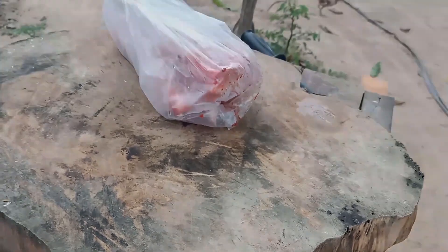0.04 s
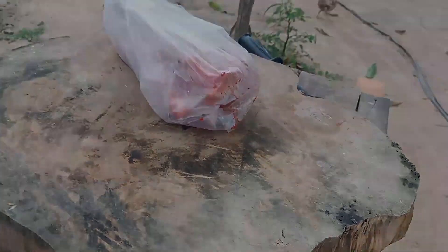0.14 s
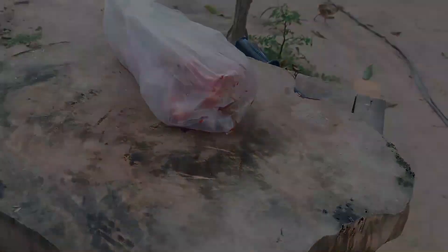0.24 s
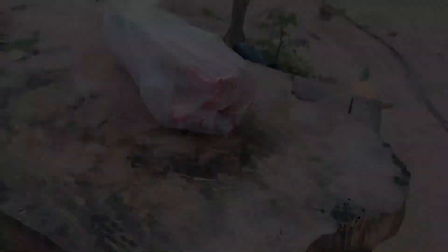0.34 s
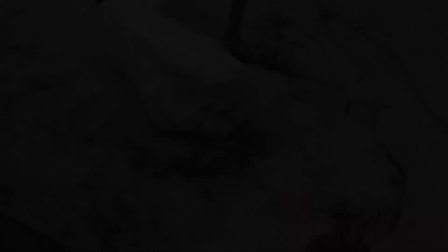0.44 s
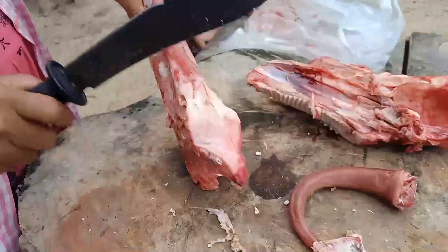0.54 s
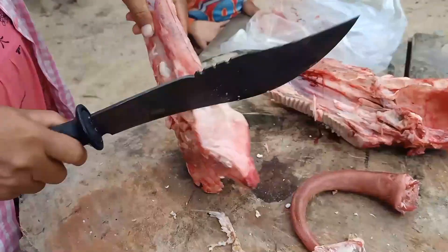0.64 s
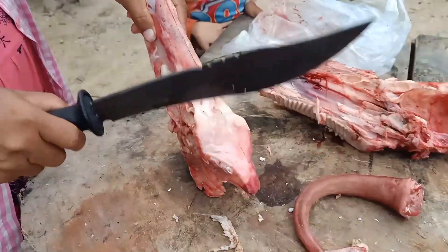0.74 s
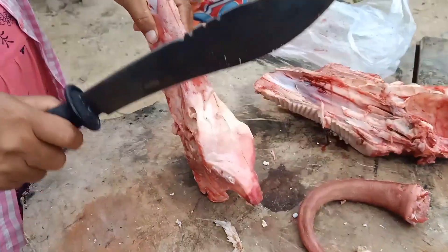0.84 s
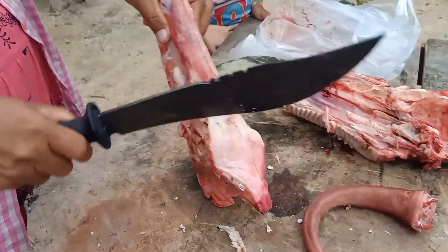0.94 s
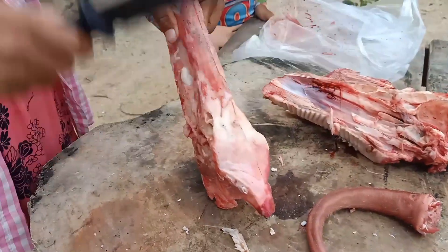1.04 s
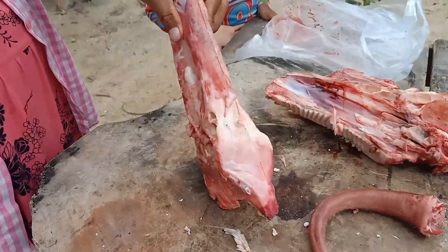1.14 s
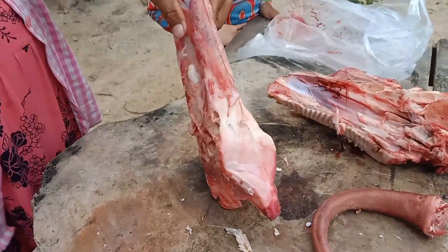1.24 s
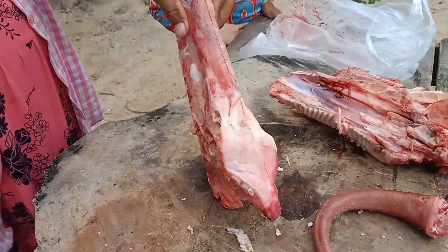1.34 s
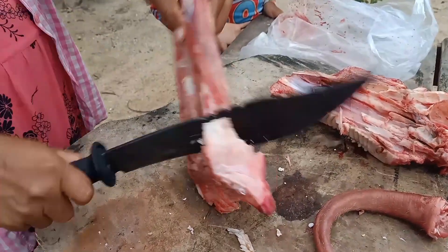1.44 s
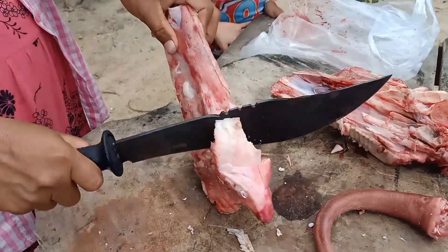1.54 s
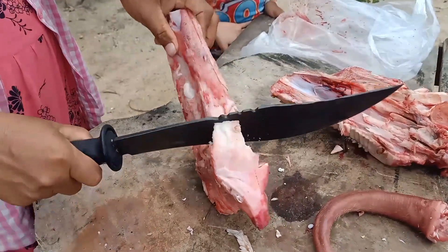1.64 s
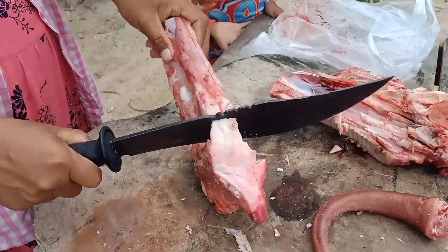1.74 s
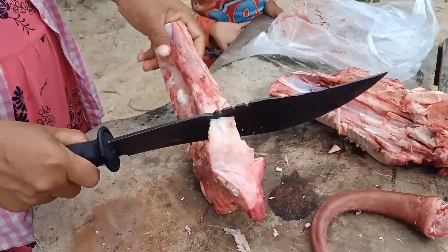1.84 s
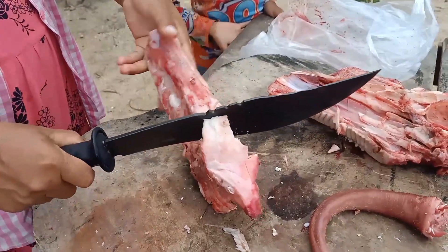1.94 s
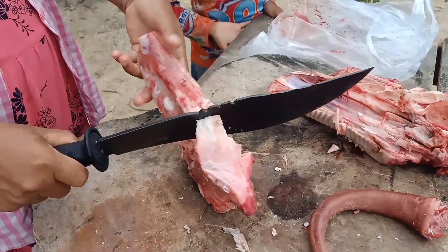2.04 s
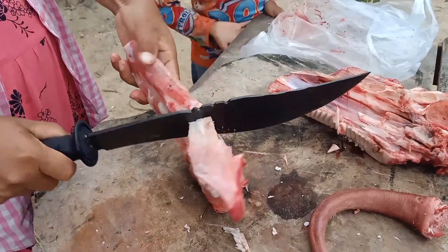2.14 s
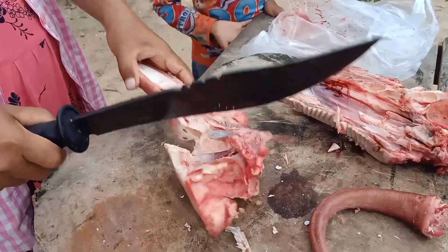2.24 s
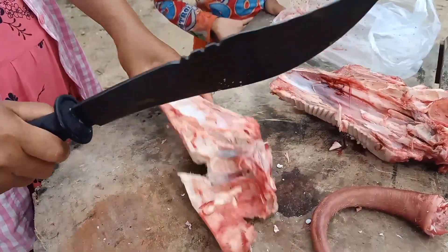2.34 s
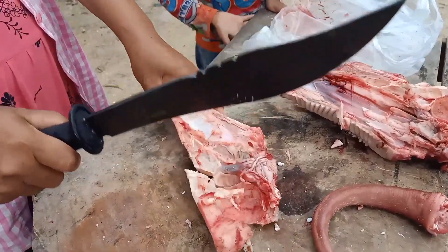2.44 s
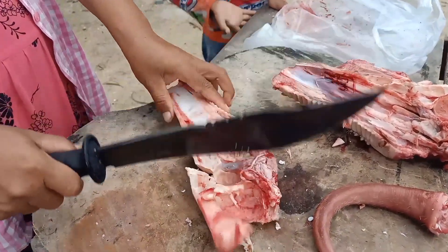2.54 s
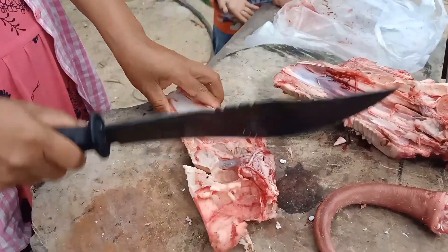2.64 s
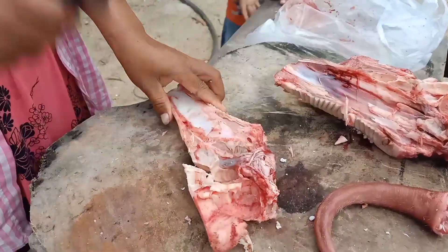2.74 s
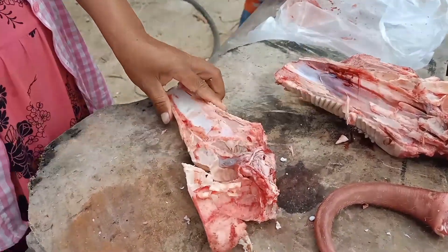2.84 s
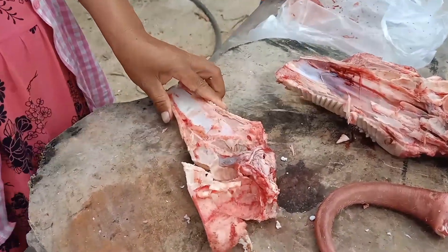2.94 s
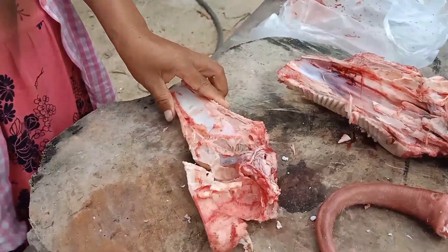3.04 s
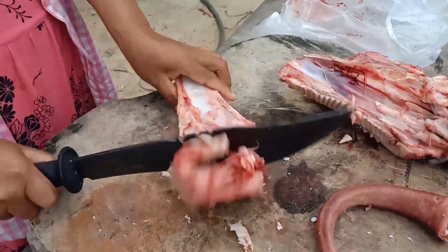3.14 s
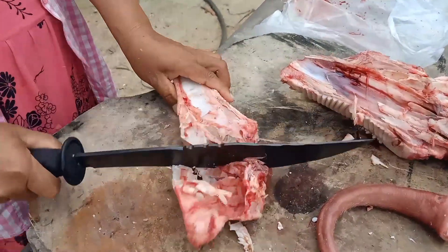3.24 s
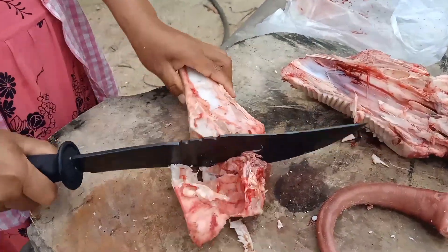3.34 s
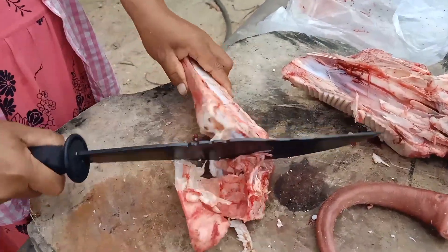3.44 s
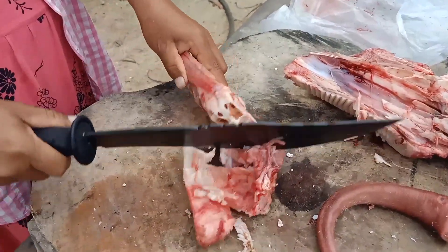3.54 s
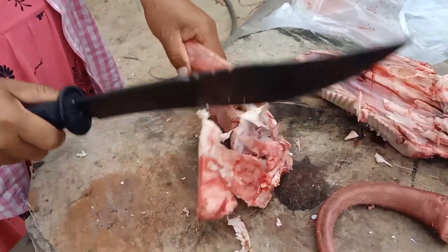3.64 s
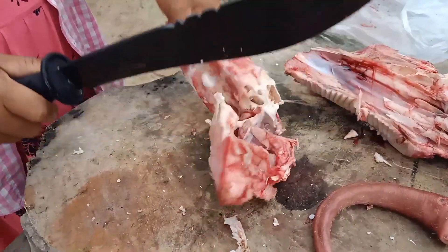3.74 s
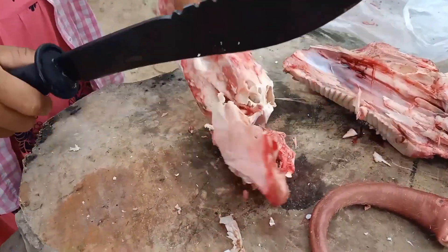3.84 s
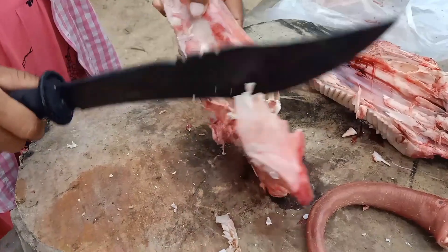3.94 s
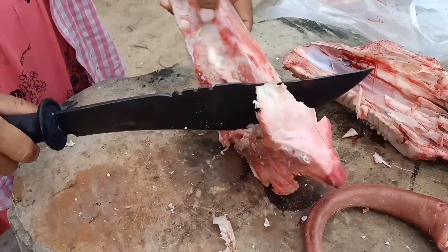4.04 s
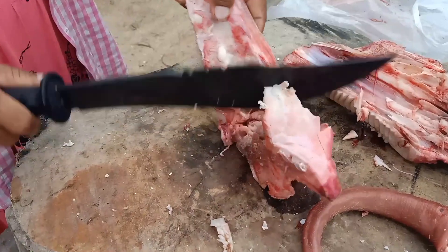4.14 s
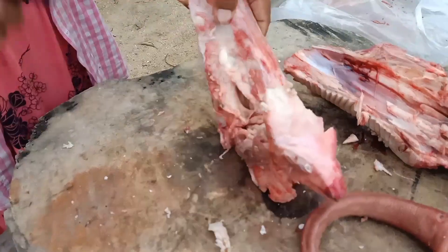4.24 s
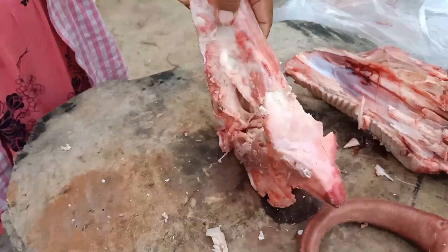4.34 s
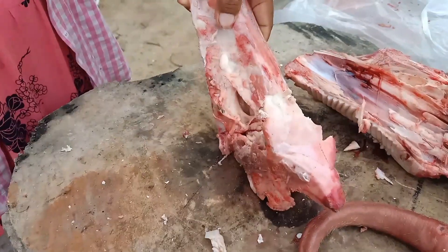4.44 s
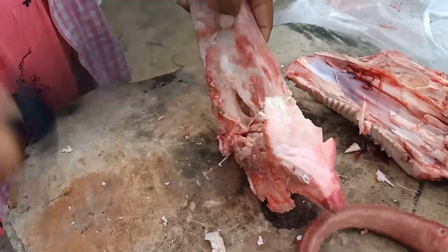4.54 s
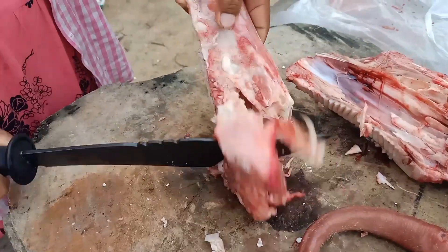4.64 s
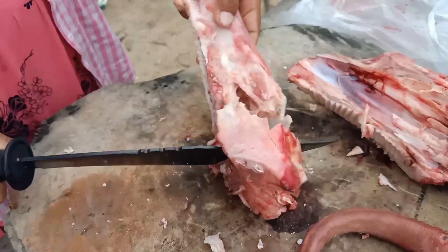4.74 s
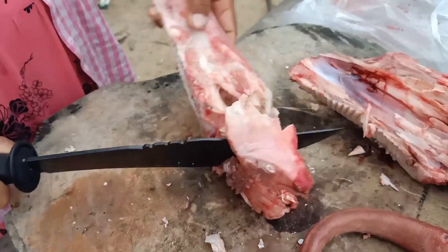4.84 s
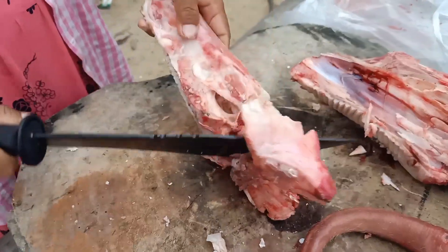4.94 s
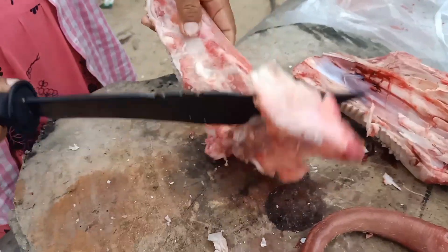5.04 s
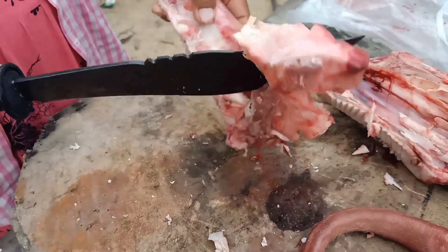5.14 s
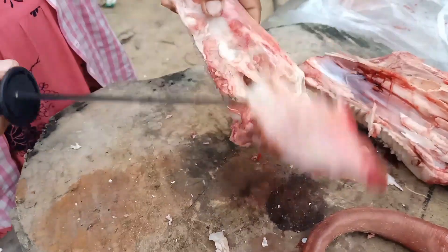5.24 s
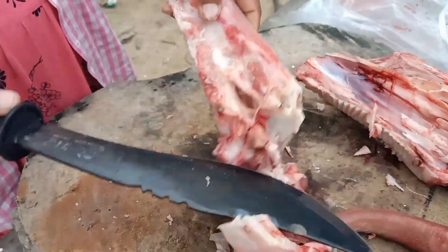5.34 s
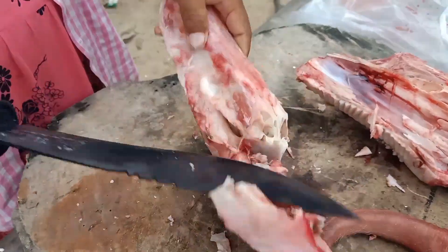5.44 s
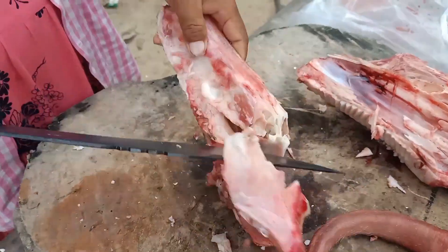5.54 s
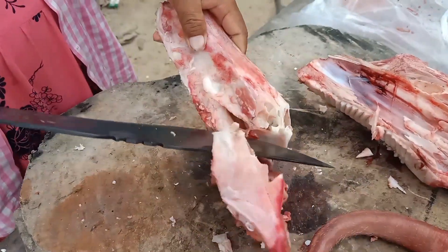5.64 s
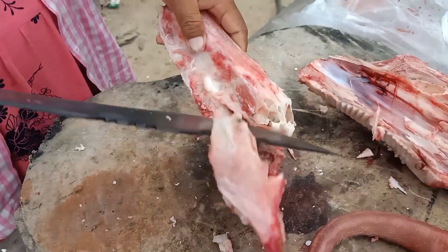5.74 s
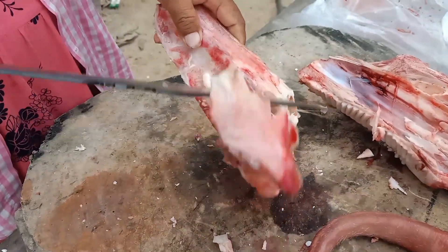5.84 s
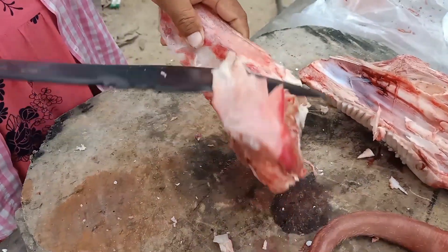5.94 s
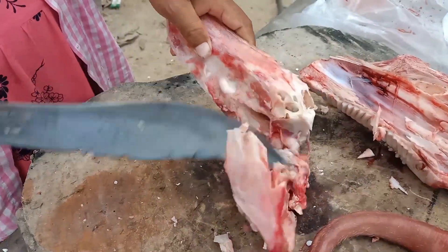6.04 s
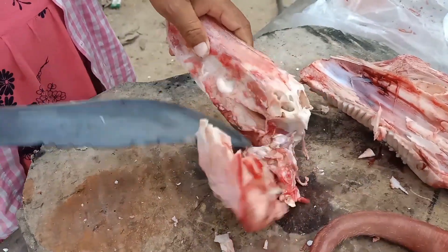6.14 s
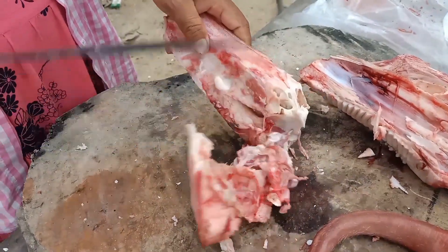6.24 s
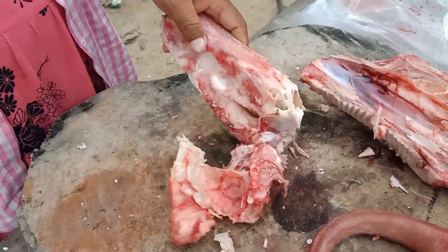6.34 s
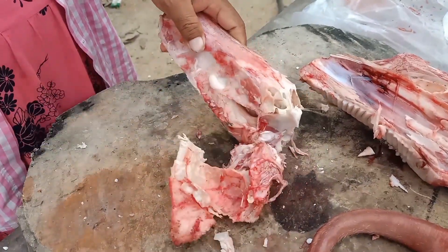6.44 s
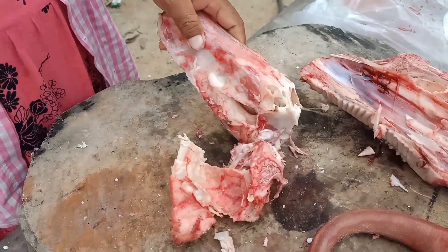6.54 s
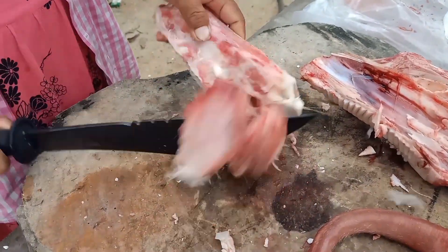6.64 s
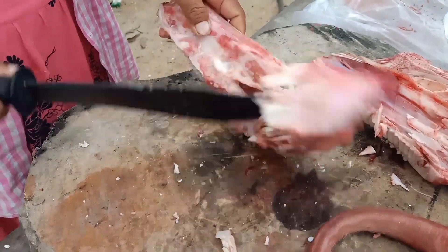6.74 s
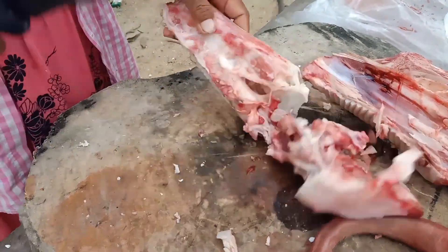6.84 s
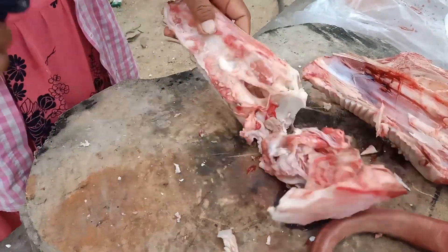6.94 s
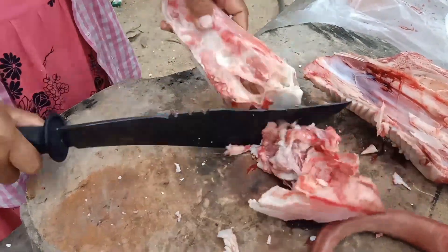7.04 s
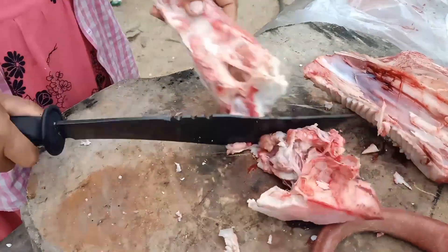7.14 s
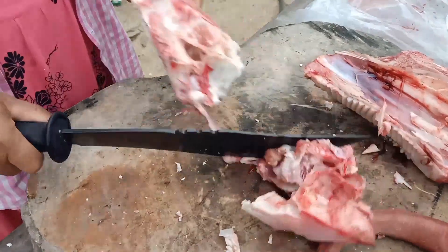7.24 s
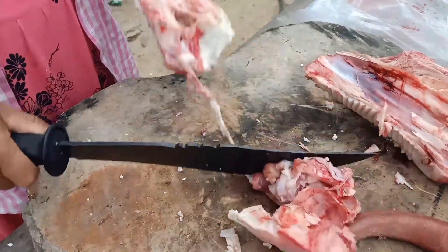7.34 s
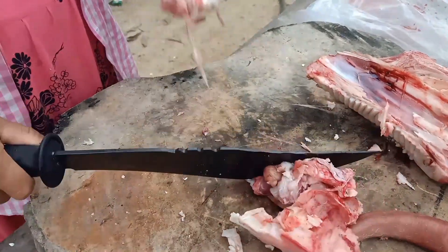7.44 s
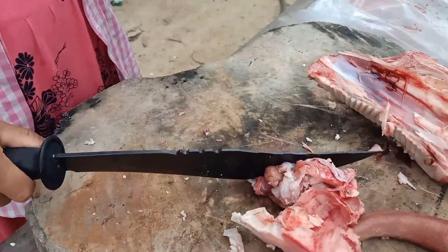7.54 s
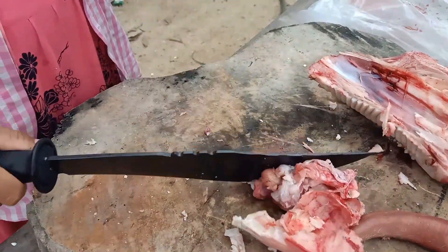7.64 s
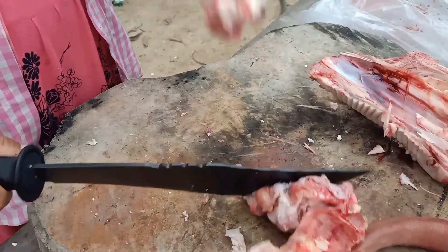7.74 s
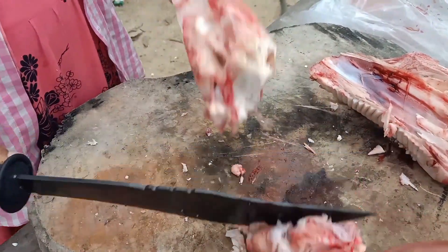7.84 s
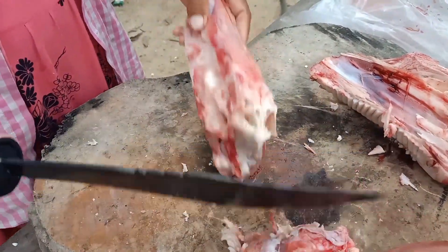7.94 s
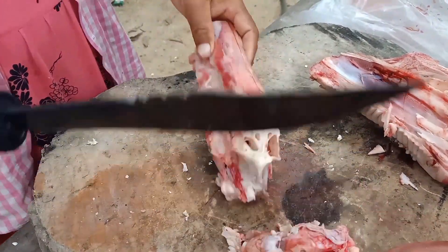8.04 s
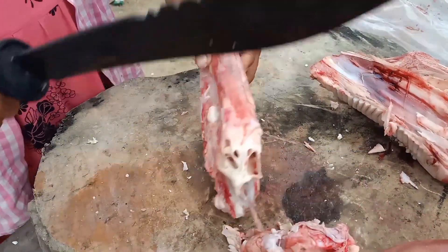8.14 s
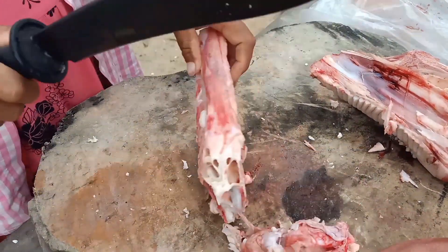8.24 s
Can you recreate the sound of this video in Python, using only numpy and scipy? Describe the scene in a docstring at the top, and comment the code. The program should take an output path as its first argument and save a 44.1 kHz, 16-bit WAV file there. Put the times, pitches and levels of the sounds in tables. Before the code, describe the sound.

For the first half second a wavering low motor hum and yard noise are heard, with a chick's falling peep close on the right and a brief hen cluck, fading to near silence by 0.6. At 0.65 a quieter yard cuts in. Knife blows on bone and a tree stump follow: softer woody ones at 0.75 and 1.0, a very loud splintering crack at 1.55, a lighter one at 2.65, loud again at 3.2, a firm chop at 4.65, a soft knock at 6.15, a hard crunch at 6.75 and a quick double at 7.1. Hollow bone bumps, gritty scrapes and wet settling fill between, with short dull echoes and low ground booms. Chicks peep throughout; a hen croons faintly around 1.2 and 2.6 to 3.2. A distant engine putters, growing slightly after 7, when peeps become clearer and a thin wavering tone appears until 8.3.

```python
"""A village yard, heard by a phone a metre from a tree-stump block. At first a motor hums, a chick peeps close
on the right and a hen clucks; all fades out near 0.6 s, then the yard cuts in and a long knife hacks at a bone.
Each chop is a noise burst of splinters with ringing block, bone and blade; bumps and wet scrapes follow it.
Behind, chicks and hen are gliding whistles, traffic and yard bustle are shaped noise, a far engine is puffs
through a resonant exhaust. A thin far tone wavers near the end."""
import sys
import numpy as np
from scipy import signal
from scipy.fft import rfft, irfft
from scipy.io import wavfile
from scipy.ndimage import uniform_filter1d

SR = 44100
rng = np.random.default_rng(int(sys.argv[2]) if len(sys.argv) > 2 else 0)


def generate_wav(signal):
    """Clip the signal to [-1, 1] and save it as 16-bit WAV at the path in sys.argv[1]."""
    frames = np.transpose(np.atleast_2d(signal))
    scaled = np.clip(frames, -1, 1) * 32767
    pcm = np.round(scaled).astype(np.int16)
    wavfile.write(sys.argv[1], SR, pcm)


N = 365588

# All levels are ahead of the master gain in scene(). Left and right are the two ports of the microphone.
# Knife blows: start_s, level_db of the splinters, then db relative to it: top_db, block_db, bone_db, thump_db,
# ground_db, blade_db, crack_db; splinter length_ms, land_ms (delay of the blow on the block)
CHOPS = [(0.756, -24, -34, 3.5, -22, 0, -25, -46, -9, 3.35, 0.38),
         (1.02, -29.5, -47, 8, 3, 5, -29.5, -19, -0.5, 5.2, 0.58),
         (1.56, -2.5, -18, -18.5, -12, -10.5, -28.5, -20, -7, 7.1, 1.58),
         (2.668, -24.5, -26.5, -13, -18, -16, -35, -42.5, -1, 4.8, 1.1),
         (3.214, -2.5, -15.5, -8, -12.5, -6, -23.5, -38, -8, 7.2, 3.16),
         (4.6641, -11.5, -14, 1.5, -18, -23.5, -22.5, -28, 0, 8, 5.14),
         (6.1567, -30.5, -27, 12, 1.5, 1, -24, -21, -2.5, 2.1, 0.26),
         (6.7427, -4, -13.5, -3, -4, -8.5, -20, -44, -1.5, 9.8, 6.15),
         (7.1242, -17, -35, -12, -6, -29, -47, -45, -15, 15.6, 2.66),
         (7.132, -10.5, -26.5, 7.5, 7.5, -4.5, -27, -36, -9.5, 3.8, 0.41)]
# Ringing modes: pitch_hz, level_db, t60_s; the thump is the stump rocking on the soil
BLOCK = [(515, 0, 0.078), (560, -12, 0.035), (660, -3.5, 0.055), (810.4, -16, 0.066), (865, -18.5, .035),
         (1260, -22.5, 0.032), (395, -28, 0.06)]
BONE = [(753.4, 1.5, 0.026), (1012, -1.5, 0.028), (1280, -9, .015), (352.4, -11, 0.042)]
THUMP = [(158.2, -8, 0.045), (267, 4.5, 0.01)]
BLADE = [(5960, 0, .1), (5500, -8, .03), (4060, -16, .04), (3350, -14, .05)]
# Noise colours: centre_hz, width_hz, level_db; splintering bone, its top treble, and settling meat
SPLINTER = [(1299, 690, 4), (2500, 800, 6), (3900, 1750, -3.5), (5540, 640, 3.5)]
TOP = [(8380, 3400, -17), (10760, 2500, -15), (13410, 1500, -16.5)]
SETTLE = [(161, 28, -1), (388.5, 152, 2.5), (847, 390, -5)]

PORT_PHASE = 0.16  # half the radians by which the left port hears a 500 Hz mode late
THUMP_PHASE = 0.35  # radians added to the port phase
PORT_LAG = 17  # samples by which the yard reaches the left port late
SING_HZ = 5607  # scrapes and rustles above this pitch involve the blade


def amp(db):
    """Decibels to amplitude."""
    return 10 ** (np.asarray(db) / 20)


def unit(x):
    """Scale to an RMS of 1."""
    return x / np.sqrt(np.mean(x ** 2))


def band(x, hz, width):
    """Resonance of gain 1 at its centre."""
    return signal.lfilter(*signal.iirpeak(hz, hz / width, SR), x)


def resonances(x, table):
    """Sum of (centre_hz, width_hz, level_db) resonances, neighbours in opposite sign."""
    return sum((-1) ** k * amp(db) * band(x, hz, width) for k, (hz, width, db) in enumerate(table))


def ring(modes, push_ms, detune, bounces=1, phase=0):
    """Damped modes set off by one smooth push or several quick ones; each port has its own phase; peak 1."""
    t = np.arange(SR // 5) / SR
    ports = np.array([[-1], [1]])
    y = 0
    for (hz, db, t60_s), shift in zip(modes, detune):
        port_phase = (phase + PORT_PHASE * (hz / 500) ** 2) * ports
        y = y - amp(db) * np.sin(2 * np.pi * hz * (1 + shift) * t + port_phase) * 1000. ** (-t / t60_s)
    one_push = np.pad(np.hanning(3 + int(push_ms * SR / 1000)), (0, 30))
    push = np.tile(one_push, bounces)
    y = signal.fftconvolve(y, push[None])[:, :len(t)]
    return y / np.abs(y).max()


def burst(noise, table, ms, fall_ms):
    """Noise that sags for ms, then dies faster, through resonances; peaks near 1."""
    t_ms = np.arange(noise.shape[-1]) * 1000 / SR
    envelope = np.exp(-1.4 * t_ms / ms - np.maximum(t_ms - ms, 0) / fall_ms)
    y = resonances(noise * envelope, table)
    return y / np.sqrt(9 * np.mean(y ** 2) * t_ms[-1] / (ms + 1))


def add(out, s, x, lag=0):
    """Mix x in at s seconds, the left channel lag samples late."""
    for c, row in enumerate(np.broadcast_to(x, (2, x.shape[-1]))):
        i = int(s * SR + (lag if c == 0 else 0))
        out[c, i:i + len(row)] += row[:N - i]


def walk(rate):
    """Random levels held 1 / rate s and smoothed twice; spread near 1."""
    k = int(SR / rate)
    steps = np.repeat(rng.standard_normal(N // k + 1), k)
    return 1.3 * uniform_filter1d(uniform_filter1d(steps, k), k)[:N]


def calls(tables, lags, overtones_db, rough, flutter_hz, edge_s):
    """Gliding tones with overtones from (time_s, pitch_hz, level_db) tables; rough flutters level and pitch."""
    out = np.zeros((2, N))
    flutter = walk(flutter_hz)
    overtones_db = np.broadcast_to(overtones_db, (len(tables), np.shape(overtones_db)[-1]))
    for table, lag, overtones in zip(tables, lags, overtones_db):
        s, hz, db = np.transpose(table)
        t = np.arange(s[0], min(s[-1], (N - 2) / SR), 1 / SR)
        wobble = flutter[int(s[0] * SR):][:len(t)]
        glide = uniform_filter1d(np.interp(t, s, hz), size=500, mode="nearest")  # every turn is rounded
        phase = 2 * np.pi * np.cumsum(glide * (1 + 0.037 * rough * wobble)) / SR
        edge = np.clip(np.minimum(t - s[0], s[-1] - t) / edge_s, 0, 1)
        tone = sum(amp(o) * np.sin((k + 1) * phase) for k, o in enumerate(overtones))
        level = np.sqrt(2) * amp(np.interp(t, s, db) + 2.9 * rough * wobble)
        add(out, s[0], level * edge * tone, lag)
    return out


def chops():
    """Bone splinters for some ms while the edge bites; block, bone and blade ring on."""
    top_share = 0.35  # the top treble lasts this share of the splintering
    crack_ms = 0.6
    crumble_db, crumble_ms = -25, 26  # bits of bone crunch on after the cut
    body_low_hz = 330  # the ring of block and bone is thinned below this
    out = np.zeros((2, N))
    for s, db, top_db, block_db, bone_db, thump_db, _, blade_db, crack_db, ms, land_ms in CHOPS:
        noise, detune = rng.standard_normal((3, 2048)), rng.standard_normal((4, 8))
        # splinters fly from many points, so each port hears its own mix
        grit = (noise[0] + 1.4 * noise[1:]) * amp(4 * rng.standard_normal(64).repeat(32))
        splinters = burst(grit, SPLINTER, ms, 2.8)
        splinters = splinters + amp(top_db) * burst(grit, TOP, top_share * ms, 1.6)
        add(out, s, amp(db) * splinters)
        crumble = burst(grit[::-1], SETTLE[1:] + SPLINTER[:2], crumble_ms, 7.4)
        add(out, s, amp(db + crumble_db) * crumble)
        add(out, s, amp(db + crack_db) * burst(noise[1:], SPLINTER, crack_ms, 0.27))
        add(out, s, amp(db + blade_db) * ring(BLADE, 0.05, 0.00089 * detune[0]))
        body = amp(block_db) * ring(BLOCK, 0.25, 0.005 * detune[1])
        body = body + amp(bone_db) * ring(BONE, 0.4, 0.04 * detune[2])
        body = signal.lfilter(*signal.butter(2, body_low_hz, "high", fs=SR), body)
        thump = amp(thump_db) * ring(THUMP, 0.95, 0.11 * detune[3], phase=THUMP_PHASE)
        add(out, s + land_ms / 1000, amp(db) * (body + thump))
    return out


def knocks():
    """Soft bumps: the bone chatters down and gives a short hollow ring with some block."""
    # Bone on block, before fixed trims: start_s, level_db; relative to it: block_db, click_db
    bumps = [(0.843, -28, -9, -36), (0.933, -34, -6, -15), (1.066, -29.5, -2, -29), (1.227, -39.5, -6, -5),
             (1.292, -41, -5, -6.5), (1.61, -32, 3, -23), (1.654, -45, 6, -18), (1.69, -26, -7, -18.5),
             (1.853, -22, -8, -41), (1.963, -36, -5, -12), (2.076, -28, -6, -24.5),
             (2.141, -41.5, 2.5, -19), (2.201, -41, 2.5, -20.5), (2.474, -46.5, 13.5, -3),
             (3.259, -26, 11, -17), (3.31, -22.5, -2.5, -16), (3.398, -40.5, -1.5, 0.5),
             (3.445, -23, -8.5, -30), (3.621, -45, -0.5, -18.5), (3.738, -43, 0, -19.5),
             (4.107, -42.5, 1, -6), (4.121, -40, 2, -6), (4.134, -38.5, -4, -9), (4.766, -20, -11, -23),
             (4.807, -32.5, -5, -37), (4.844, -34.5, -5, -16), (4.935, -29, -7, -14.5),
             (5.056, -43, -2.5, -15), (5.082, -35.5, -10, -21), (5.128, -43, -13.5, 1),
             (5.452, -44, 13.5, 10), (5.7, -38.5, -19, 0.5), (6.394, -44, -24.5, -0.5),
             (6.477, -33, 7, -17), (6.88, -16.5, -24, -23), (6.935, -32.5, 16, 4), (7.031, -25, -15, -20),
             (7.106, -36.5, -16.5, -25), (7.359, -23, -4, -20.5), (7.475, -39, -11, -15),
             (7.605, -33, 0, -20.5)]
    settle_db, settle_s = -15.5, 0.009  # meat settles, under the bump's level and this much later
    out = np.zeros((2, N))
    for s, db, block_db, click_db in bumps:
        noise, detune = rng.standard_normal((2, 1024)), rng.standard_normal((3, 8))
        bone = ring(BONE, 0.55, 0.02 * detune[0], bounces=3)
        bone += 0.5 * ring(BONE, 0.26, 0.013 * detune[2])
        bone += 0.14 * ring(THUMP, 0.58, 0.074 * detune[2], phase=THUMP_PHASE)
        block = amp(block_db - 12.5) * ring(BLOCK, 1.26, 0.0038 * detune[1])
        add(out, s, amp(db) * (0.38 * bone + block))
        click = burst(band(noise, 1800, 2500), SPLINTER[:2], 0.79, 2.5)
        add(out, s, amp(db + click_db) * click)
        meat = burst(noise[0] + 0.51 * noise[::-1], SETTLE, 5, 2.4)
        add(out, s + settle_s, amp(db + settle_db) * meat)
    return out


def ticks():
    """Short gritty scrapes of blade on bone or wet meat letting go; the highest set the blade singing."""
    # Scrapes: start_s, level_db, centre_hz, top_db relative to the level, length_ms
    scrapes = [(1.267, -49, 5300, -45.5, 3.6), (1.893, -52, 2280, -32.5, 2.1), (2.466, -52, 1800, -40, 2.5),
               (2.475, -52, 5500, -35.5, 2.1), (2.49, -44, 1400, -40, 4.9), (2.501, -48.5, 3850, -32, 2.8),
               (3.117, -49, 5450, -37.5, 2.6), (3.319, -41.5, 3250, -40, 2.9),
               (3.553, -53.5, 5480, -34.5, 4), (3.7472, -58.5, 5930, -30.5, 1.9),
               (4.1112, -49.5, 3420, -22, 9.3), (4.135, -50.5, 4600, -37.5, 6.4),
               (4.7897, -49.5, 5050, -25, 2.5), (4.846, -43.5, 1930, -41, 8.3),
               (5.0858, -37, 1430, -41, 7.1), (5.4448, -34, 2500, -35, 5.4), (5.47, -37.5, 4300, -44, 7.3),
               (5.701, -43.5, 2800, -35.5, 2.5), (6.097, -41, 2360, -38, 5.7),
               (6.1308, -41.5, 1620, -33.5, 8.7), (6.1814, -53, 2980, -29, 2.6),
               (6.2265, -47.5, 4820, -36.5, 2.9), (6.2783, -32, 2100, -35.5, 4.7),
               (6.8528, -29.5, 2420, -35.5, 3.1), (6.8753, -31, 2770, -41, 2.7),
               (6.899, -38, 5070, -30, 5.1), (6.958, -41.5, 1510, -28, 2.5), (6.969, -50.5, 4340, 0, 4.1),
               (7.022, -37.5, 2500, -61.5, 1.4), (7.082, -48.5, 2390, -41, 2.9),
               (7.393, -44, 5620, -23.5, 3.7)]
    sing_db, faint_db = 6, -27  # the blade's ring relative to a high scrape, and to any other
    out = np.zeros((2, N))
    for s, db, hz, top_db, ms in scrapes:
        noise = rng.standard_normal((3, 1024))
        grit = (noise[0] + 0.9 * noise[1:]) * amp(4 * rng.standard_normal(32).repeat(32))
        colour = [(hz, 1200, 0)] + [(f, w, d - 14) for f, w, d in SPLINTER]
        scrape = burst(band(grit, hz, 2000), colour, ms, 0.42)
        scrape = scrape + amp(top_db) * burst(grit, TOP, ms, 0.91)
        add(out, s, amp(db) * scrape)
        blade_db = sing_db if hz > SING_HZ else faint_db
        add(out, s, amp(db + blade_db) * ring(BLADE, 0.05, np.zeros(4)))
    return out


def thuds():
    """Each chop booms in the ground, a low rising tone lingers after hard ones; the ports hear it out of step."""
    # Soil under the stump: pitch_hz, level_db, t60_s
    soil = [(52, -5.5, 0.06), (87, 0, 0.055)]
    # Low tone, perhaps the blade flexing in the cut: after_chop_s, pitch_hz, level_db
    quiver = [(.03, 66.02, -62), (.35, 76.15, -64), (.75, 86, -71.5)]
    ground_phase = 0.7  # radians added to the port phase
    quiver_from_db = -14  # only harder chops leave the tone
    out = np.zeros((2, N))
    for s, db, *_, ground_db, _, _, _, land_ms in CHOPS:
        boom = ring(soil, 1.8, 0.11 * rng.standard_normal(2), phase=ground_phase)
        add(out, s + land_ms / 1000, amp(db + ground_db) * boom)
    hard = [row[0] for row in CHOPS if row[1] > quiver_from_db]
    tones = [[(s + late, hz, db) for late, hz, db in quiver] for s in hard]
    return out + calls(tones, [40] * len(hard), [0, -4], 0.9, 20, 0.03)


def scratches():
    """Short patches of gritty rustle, of meat on wood or feet in litter; narrow ones are the blade rattling on bone."""
    # Rustles: start_s, length_s, level_db, centre_hz
    rustles = [(1.22, 0.12, -60.5, 2000), (2.12, 0.068, -70, 2780), (2.294, 0.11, -63, 2270),
               (2.962, .09, -65.5, 2900), (3.088, 0.044, -56.5, 2580), (3.578, 0.079, -67, 2800),
               (3.778, 0.15, -58, 2570), (4.104, .04, -55, 910), (4.845, 0.021, -51, 1600),
               (5.433, 0.067, -52, 2600), (5.784, 0.053, -59, 3100), (7.532, 0.051, -56.5, 2600),
               (7.294, 0.13, -61, 5800), (5.588, .045, -64, 2900), (1.948, 0.12, -70.5, 2400),
               (3.331, .09, -67, 1050), (6.892, 0.081, -59.5, 1500), (6.9, .04, -56, 4500)]
    out = np.zeros((2, N))
    for s, length, db, hz in rustles:
        noise = rng.standard_normal((3, 8192))
        grain = np.minimum(rng.exponential(size=128), 3).repeat(64)
        width_hz = 150 if hz > SING_HZ else 1200
        grit = (noise[0] + noise[1:]) * amp(3 * grain)
        grit = band(band(grit, hz, width_hz), hz, 2 * width_hz)
        n = int(length * SR)
        add(out, s, amp(db) * unit(grit)[:, :n] * np.hanning(n) ** 0.5, PORT_LAG)
    return out


def near_chick():
    """Two falling whistles of one chick close on the right."""
    # One table a peep: time_s, pitch_hz, level_db (before the balance below)
    falls = [
        [(0.088, 4120, -62), (.122, 3780, -50), (0.134, 3320, -37), (0.166, 3084, -37), (0.186, 2500, -50)],
        [(0.45, 4300, -76), (.502, 3760, -60.5), (0.513, 3260, -47.5), (.545, 3150, -49.5), (0.562, 2600, -54)],
    ]
    left_right_db = [[-6], [3]]
    return calls(falls, [-11] * 2, [0, -45], 0.028, 80, 0.01) * amp(left_right_db)


def peeps(rows):
    """Pitch and level of each peep: it swells on a slightly arched note, then drops."""
    # How well each pitch comes through: pitch_hz, gain_db
    carry = [(1700, 4), (2600, 6), (3100, -1.5), (3600, -4.5), (4100, 3.5), (4550, 1.5), (5200, 1.5)]
    held_s = 0.02  # a shorter peep is a falling cheep without the arch
    rise, sag = 0.045, 0.03  # shares of the pitch by which a held note starts and ends flat
    arch = 0.3  # share of the hold spent rising
    bend = 2.8  # over 1 the drop after a held note starts gently and steepens
    swell_db = 5.5  # gain over the hold
    s, hold, drop, hz, end_hz, db = np.transpose(rows)
    hold = np.maximum(hold, 0)
    held = hold > held_s
    knee_hz = hz * (1 - sag * held)
    part = np.linspace(0, 1, num=8)[:, None]
    times = np.vstack([s, s + hold * arch, s + hold + part * drop])
    fall_hz = knee_hz + part ** np.where(held, bend, 1) * (end_hz - knee_hz)
    pitch = np.vstack([hz * (1 - rise * held), hz, fall_hz])
    level = np.vstack([db - swell_db, db - swell_db / 2, db + 0 * part])
    level = level + np.interp(pitch, *np.transpose(carry))
    return np.transpose([times, pitch, level], (2, 1, 0))


def brood():
    """Chicks about the yard whistle notes that drop at the end."""
    # Peeps: start_s, hold_s, drop_s, note_hz, end_hz, level_db (before the gain by pitch)
    notes = [(0.646, 0.0027, 0.014, 4010, 3080, -60.5), (0.788, 0.05, 0.037, 4070, 2700, -63.5),
             (0.955, 0.01, .066, 4420, 3400, -68), (1.1, 0.16, 0.022, 4880, 4600, -70.5),
             (1.16, 0.1, 0.033, 4060, 2750, -55.5), (1.29, 0.0011, 0.047, 4090, 2265, -59),
             (1.315, 0.011, 0.033, 3800, 2680, -66), (1.366, 0.0056, 0.039, 3210, 2590, -67.5),
             (1.51, 0, 0.028, 4350, 3900, -73.5), (1.79, 0, 0.025, 4230, 3240, -65),
             (1.906, 0.0097, 0.054, 3510, 1987, -69.5), (1.93, 0, 0.034, 4150, 3260, -68.5),
             (1.99, 0.095, 0.013, 4090, 3510, -63.5), (2.11, 0.034, 0.12, 4760, 2604, -69.5),
             (2.278, 0.00075, 0.032, 3950, 3430, -65), (2.244, 0.057, 0.012, 4045, 3870, -66.5),
             (2.297, 0.025, 0.011, 3180, 2800, -65.5), (2.34, 0.055, 0.085, 4880, 2620, -67.5),
             (2.63, 0.02, 0.032, 2045, 1914, -73), (2.68, 0.0061, 0.022, 3470, 2500, -64.5),
             (2.681, 0.1, 0.029, 3950, 2760, -54.5), (2.842, 0.0093, 0.018, 3010, 2430, -60.5),
             (2.965, 0, 0.034, 3570, 2500, -66.5), (3.02, 0.0019, 0.022, 3010, 2510, -63),
             (3.036, 0, 0.053, 3950, 3480, -63.5), (3.105, 0.058, 0.032, 4080, 3600, -57.5),
             (3.41, 0.041, 0.06, 4140, 2700, -67.5), (3.45, 0.0014, 0.035, 3840, 2710, -69),
             (3.59, 0, 0.029, 3360, 2420, -72), (3.564, 0.0029, 0.039, 4150, 3410, -69),
             (3.645, 0, 0.019, 3420, 2500, -69.5), (3.686, 0, 0.014, 4220, 3480, -69.5),
             (3.705, 0.037, 0.056, 4210, 2750, -66), (3.832, 0.027, 0.13, 4020, 1860, -67.5),
             (3.878, 0.029, .027, 3840, 2570, -68), (4.016, 0.046, 0.032, 4180, 3820, -63.5),
             (4.055, 0.0023, .022, 4050, 2400, -64.5), (4.072, 0, 0.023, 3480, 2050, -66.5),
             (4.147, 0.063, 0.018, 4950, 4600, -69.5), (4.22, 0, 0.068, 3900, 2976, -71),
             (4.374, 0.064, 0.041, 4280, 2500, -63.5), (4.47, 0.016, 0.019, 3300, 2427, -61),
             (4.53, 0.025, 0.045, 3800, 2210, -65.5), (4.575, 0.1, .011, 5180, 5170, -66),
             (4.59, 0.032, 0.0089, 4730, 4580, -66), (4.716, 0.0031, 0.02, 3220, 2710, -62),
             (4.79, .03, 0.094, 4030, 3860, -78), (5.13, 0.0055, 0.05, 4900, 4200, -67.5),
             (5.23, 0.08, .03, 4680, 4500, -76.5), (5.1, 0.088, .035, 4140, 4030, -67.5),
             (5.192, 0.014, 0.023, 3390, 2440, -66.5), (5.243, 0, 0.023, 3790, 2620, -67),
             (5.318, 0.0028, .035, 4080, 2730, -68), (5.37, 0.076, .015, 4940, 4530, -63.5),
             (5.47, 0.041, 0.028, 4200, 3900, -65.5), (5.554, 0.005, 0.012, 3220, 2360, -58),
             (5.66, 0.08, 0.042, 4530, 4100, -69.5), (5.77, 0.0016, 0.023, 3170, 2240, -63),
             (5.896, 0, 0.051, 2940, 1720, -66.5), (5.955, 0.03, 0.019, 4040, 3900, -69.5),
             (6.016, 0, 0.018, 3210, 2450, -63), (6.02, 0.021, .1, 5080, 4290, -65),
             (6.33, .1, 0.044, 4650, 4190, -64.5), (6.34, 0.0046, 0.024, 3400, 2340, -59.5),
             (6.446, 0.0063, 0.015, 3070, 2340, -59), (6.49, 0.0088, .02, 3100, 2605, -64.5),
             (6.546, 0.0026, 0.019, 3180, 1996, -55.5), (6.675, 0.0036, 0.02, 3200, 2280, -63),
             (6.576, 0.08, 0.049, 4240, 2210, -63.5), (6.62, 0.12, .02, 4930, 4800, -66.5),
             (6.94, 0.04, 0.049, 4250, 3200, -67), (7.308, 0.057, 0.051, 4260, 2500, -58),
             (7.385, 0.015, .022, 2776, 1910, -63.5), (7.3, 0.14, 0.1, 4570, 2540, -57),
             (7.33, .13, 0.02, 4730, 4450, -65), (7.596, 0.06, 0.1, 4900, 2470, -61.5),
             (7.67, 0.029, .035, 3900, 2650, -69), (7.722, 0.075, 0.068, 4080, 2610, -57.5),
             (7.87, 0.031, .04, 4530, 4080, -64), (7.97, 0, .05, 3210, 2850, -75),
             (8.03, .165, 0.059, 4570, 2480, -56), (8.09, 0.048, 0.0076, 4780, 4680, -68),
             (8.17, 0, 0.034, 3220, 1980, -75.5), (8.23, 0.07, .01, 3994, 3980, -62),
             (8.255, 0, 0.015, 3210, 2500, -51)]
    return calls(peeps(notes), [15] * len(notes), [0, -36], 0.16, 60, 0.0056)


def croons():
    """The hen's pitch bends early, then levels off, while the throbbing voice swells."""
    # Croons and clucks: start_s, length_s, first_hz, last_hz, last level_db (before the throb), overtones_db
    voice = [(0.126, 0.031, 1065, 1004, -56, -11), (0.162, 0.044, 580, 570, -61, -19),
             (1.165, 0.38, 541.4, 733, -61, -8), (2.579, 0.2, 277, 312.3, -64.5, -10),
             (2.87, .11, 269, 255, -67.5, -13.5), (2.877, 0.063, 628, 625, -70, -2.5),
             (2.981, 0.21, 488, 604, -67, -6), (3.818, 0.0696, 835, 644, -72, -6),
             (6.54, 0.11, 891, 823, -68.5, -16.5), (6.644, 0.046, 748, 737, -76.5, 11.5)]
    bend, swell_db_per_s = 0.8, 19.5  # a bend under 1 moves the pitch most at the start
    s, length, first_hz, last_hz, db, over_db = np.transpose(voice)
    part = np.linspace(0, 1, num=9)[:, None]
    pitch = first_hz + (last_hz - first_hz) * part ** bend
    level = db - swell_db_per_s * length * (1 - part)
    tables = np.transpose([s + part * length, pitch, level], (2, 1, 0))
    overtones = np.transpose([0 * db, over_db, 1.5 * over_db - 3])
    hen = calls(tables, [8] * len(voice), overtones, 0.6, 80, 0.015)
    throb_hz = 30 + 4 * walk(12)
    return hen * (1 + 0.7 * np.sin(2 * np.pi * np.cumsum(throb_hz) / SR))


def far_chicks(db, count):
    """The rest of the brood peeps at random times, mostly short falling cheeps."""
    s, note, hold, drop, loud = rng.random((count, 5)).T
    hz = 2900 + 1700 * note
    hold_s = 0.0027 + 0.048 * hold ** 4
    drop_s = 0.01 + 0.025 * drop
    rows = np.transpose([s * 8.2, hold_s, drop_s, hz, hz * 0.72, db + 9 * loud])
    return calls(peeps(rows), [PORT_LAG] * count, [0], 0.3, 60, 0.012)


def echoes(x):
    """Huts and trees return a short, dull, unrelated wash to each port."""
    t60_s, level_db = 0.26, -23
    delay_s, low_hz = 0.0009, 744  # nearest wall; below this pitch little returns
    wall_s, wall_spread_s, wall_db = 0.04, 0.012, 4  # one wall answers louder
    patchy_db = 4  # the wash comes in lumps
    t = np.arange(int(0.5 * SR)) / SR
    tail = rng.standard_normal((2, len(t))) * 1000. ** (-t / t60_s) * np.clip((t - delay_s) / 0.0094, 0, 1)
    lumps = uniform_filter1d(rng.standard_normal(len(t) // 150).repeat(150), size=60)
    tail *= amp(patchy_db * lumps + wall_db * np.exp(-((t - wall_s) / wall_spread_s) ** 2))
    tail = signal.lfilter([1], [1, -0.1], tail)
    tail = signal.lfilter(*signal.butter(2, low_hz, "high", fs=SR), tail)
    tail = tail / np.sqrt(np.sum(tail ** 2) / 2)
    return amp(level_db) * signal.fftconvolve(x, tail, axes=1)[:, :N]


def hum():
    """A motor hums at first: a wavering low tone with four overtones."""
    # Motor: time_s, pitch_hz, level_db
    motor = [(0, 118.1, -56), (.3, 116.1, -64), (.58, 116.8, -74)]
    return calls([motor], [0], [-1.5, -3.0, -12.0, -23, -20.5], 0.35, 22.5, 0.0047)


def whine():
    """A thin far tone that wavers."""
    # Tone: time_s, pitch_hz, level_db
    thin_tone = [(7.35, 870, -78), (7.5, 870, -68), (8.25, 860, -69)]
    return calls([thin_tone], [PORT_LAG], [0], 0.32, 30, 0.019)


def engine():
    """A slow engine idles far off: one puff a firing, each a little different, rings the exhaust."""
    # Idle: time_s, firing_hz, level_db
    idle = [(.6, 28.27, -73), (.64, 28.28, -71.5), (2.799, 28.27, -72), (4.001, 28.63, -66),
            (4.6, 28.96, -68), (6.0, 28.79, -67.5), (7.4, 28.45, -60), (8.29, 27.7, -61)]
    # Exhaust resonances, passed twice: centre_hz, width_hz, level_db
    exhaust = [(79.44, 42, 1), (160, 120, 1.5), (300, 110, 1), (418, 68, -5.5)]
    s, hz, db = np.transpose(idle)
    t = np.arange(N) / SR
    firings = np.cumsum(np.interp(t, s, hz) * (1 + 0.002 * walk(15))) / SR
    size = amp(1.5 * rng.standard_normal(400))[firings.astype(int)]
    puffs = np.diff(firings // 1, prepend=0) * size
    return unit(resonances(resonances(puffs, exhaust), exhaust)) * amp(np.interp(t, s, db))


def drone(table, alike):
    """Narrow wavering noise bands, passed twice; the nearer alike is to 1, the more the ports agree."""
    noise = rng.standard_normal((3, N))
    mix = noise[0] + np.sqrt(1 - alike) * noise[1:]
    return unit(resonances(resonances(mix, table), table))


def traffic(t):
    """Two bands of far drone; the upper swells for a moment after all but the softest chops, most after hard ones."""
    # Levels: time_s, deep_db (under 110 Hz), low_db (over it, before the swell)
    levels = [(0, -56, -53), (0.25, -62, -77), (0.46, -76, -71.5), (2.6, -78, -72), (4.5, -77, -71),
              (6.3, -69, -62), (7.1, -82, -70.5), (7.55, -75, -62.5), (8.29, -69.5, -62.5)]
    # Drone bands: centre_hz, width_hz, level_db a pass
    deep_bands = [(80, 87, 0.025), (48.4, 15, 0.0022)]
    low_bands = [(132, 15, -1.5), (168.4, 22, 1), (214.6, 40, -8.5)]
    swell_db, rise_s, fall_s = 38, 0.13, 0.17  # gain ahead of the rise-and-fall shape
    softest_db = -27  # a softer chop causes no swell
    s, db = np.transpose(CHOPS)[:2, :, None]
    since = np.maximum(t - s, 0)
    hardness = np.clip(1 - db / softest_db, 0, 1) ** 0.5
    swell = hardness * (1 - np.exp(-since / rise_s)) * np.exp(-since / fall_s)
    s, *columns = np.transpose(levels)
    deep, low = (amp(np.interp(t, s, c)) for c in columns)
    low = low * amp(swell_db * swell.max(axis=0))
    return deep * drone(deep_bands, 0.076) + low * drone(low_bands, 1.0)


def murmur(spectrum, alike, flicker_db, rate):
    """Half-octave noise bands, each flickering on its own; alike is the power share common to both ports."""
    hz, db = np.transpose(spectrum)
    f, out = np.fft.rfftfreq(N, 1 / SR) + 1, 0
    noise = rng.standard_normal((3, N))
    stir_db = 0.6 * walk(10)  # all bands stir together, the treble most
    common = np.array([np.roll(noise[0], PORT_LAG), noise[0]])
    both = np.sqrt(alike) * common + np.sqrt(1 - alike) * noise[1:]
    both = rfft(both) * amp(np.interp(np.log(f), np.log(hz), db))
    for centre in hz[0] * 2 ** np.arange(0, np.log2(hz[-1] / hz[0]) + 0.5, 0.5):
        share = np.clip(1 - 2 * np.abs(np.log2(f / centre)), 0, 1)
        level_db = flicker_db * walk(rate) + (1 + centre / 7000) * stir_db
        out = out + irfft(both * share, N) * amp(level_db)
    return unit(out)


def bustle(t):
    """Yard bustle and a far flock, two flickering noise beds that come and go."""
    # Levels: time_s, bustle_db, flock_db
    levels = [(0.0, -53.5, -53.5), (0.46, -72, -64), (0.69, -64, -64.5), (0.9, -69.5, -70),
              (1.29, -69, -68.5), (1.55, -69, -69), (2.12, -69, -70.5), (2.5, -66.5, -68),
              (3.141, -66.5, -65), (3.35, -59, -65.5), (3.58, -70.5, -70.5), (4.34, -65, -64),
              (4.99, -61, -67.5), (5.29, -64, -61.5), (5.93, -67.5, -64.5), (6.28, -62, -60),
              (6.931, -67.5, -65.5), (7.551, -59.5, -60), (8.29, -59.5, -58.5)]
    # Relative spectra: pitch_hz, level_db per Hz
    bustle_spectrum = [(150, -25.5), (250, -5), (509, -4), (679, -7), (849, -5), (1040, -7), (1800, -15),
                       (2340, -37), (3960, -120)]
    flock_spectrum = [(880, -23.5), (1500, -5), (2660, -4), (3410, -11.5), (3960, -0.5), (4550, -13.5),
                      (5490, -8), (7540, -27.5), (8240, -31), (9750, -35), (11500, -36.5), (12400, -36.5),
                      (13700, -30.5), (16000, -56.5)]
    s, *columns = np.transpose(levels)
    mid, high = (amp(np.interp(t, s, c)) for c in columns)
    return mid * murmur(bustle_spectrum, 0.7, 2.5, 12) + high * murmur(flock_spectrum, 0.65, 2.6, 30)


def scene():
    """Blows at the block, birds and yard with their echoes, under one master gain."""
    # Master gain, fading out and cutting back in: time_s, gain_db
    fade = [(0, 2.5), (.3, 6), (.45, 5), (.55, -5.5), (.585, -31), (0.641, -55), (0.648, 13), (8.3, 3)]
    dip_hz, dip_width_hz, dip_share = 1721, 1100, 0.65  # the blows are weak in this band
    bird_echo = 4.6  # birds stand farther off than the block, so more of them comes by the walls
    t = np.arange(N) / SR
    yard = traffic(t) + engine() + hum() + bustle(t)
    near = near_chick()
    birds = near + brood() + far_chicks(db=-81, count=220) + croons() + whine()
    hits = chops() + knocks() + ticks()
    # the blows come through without deep bass
    hits = signal.sosfilt(signal.butter(2, 130, "high", fs=SR, output="sos"), hits)
    hits = hits - dip_share * band(hits, dip_hz, dip_width_hz)
    wash = echoes(hits + bird_echo * (birds - near / 2))
    s, db = np.transpose(fade)
    return (yard + birds + hits + thuds() + scratches() + wash) * amp(np.interp(t, s, db))


def record(dry):
    """The phone's input clips at 0.93 of full scale; the deepest bass and the top are cut."""
    low_hz, top_hz = 52, 15700
    clipped = np.clip(dry, -0.93, 0.93)
    wet = signal.sosfilt(signal.butter(3, low_hz, "high", fs=SR, output="sos"), clipped)
    return signal.sosfilt(signal.ellip(10, 0.2, 70, top_hz, fs=SR, output="sos"), wet)


dry = scene()
out = record(dry)
generate_wav(out)
```